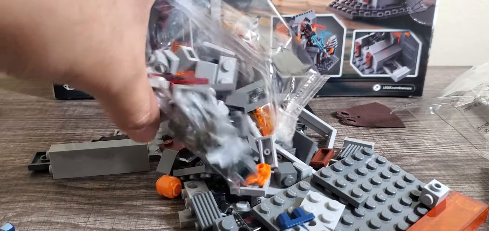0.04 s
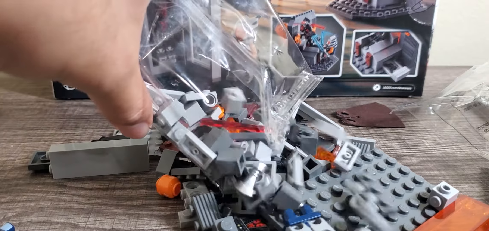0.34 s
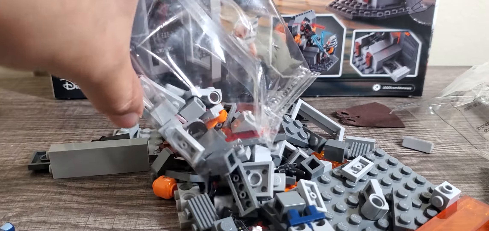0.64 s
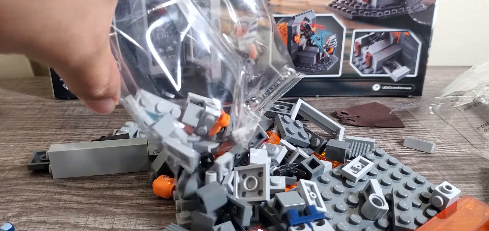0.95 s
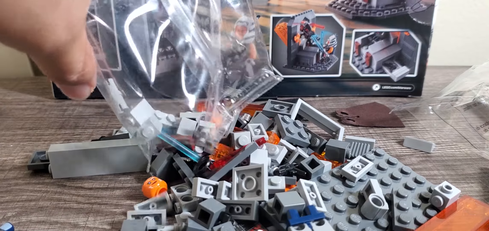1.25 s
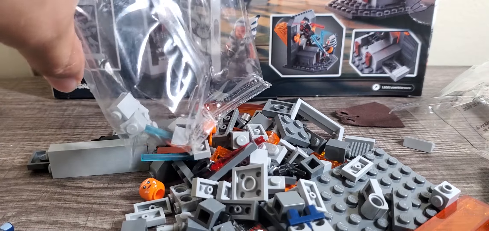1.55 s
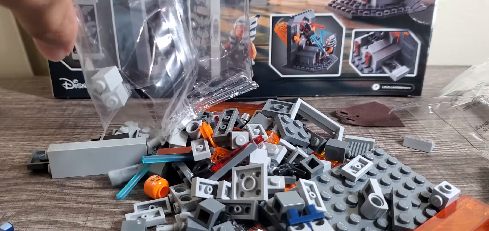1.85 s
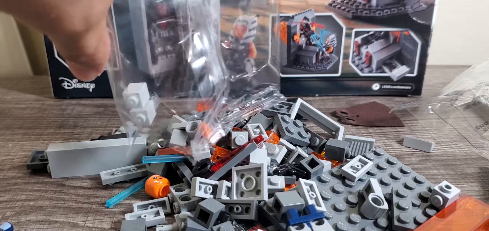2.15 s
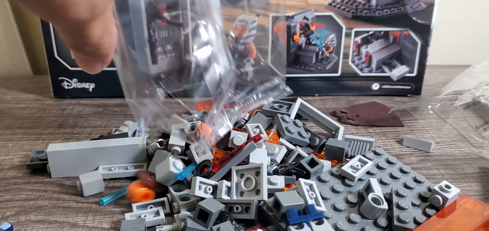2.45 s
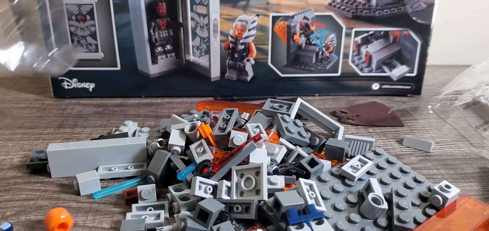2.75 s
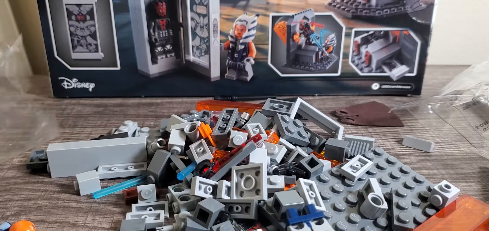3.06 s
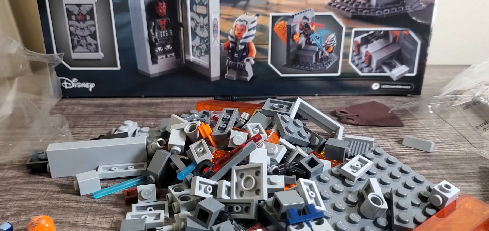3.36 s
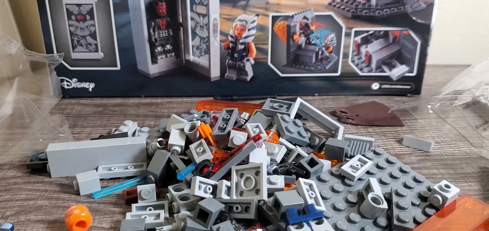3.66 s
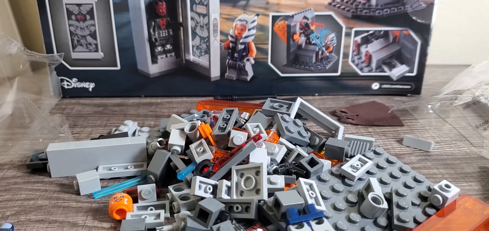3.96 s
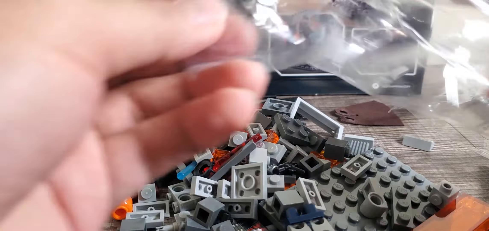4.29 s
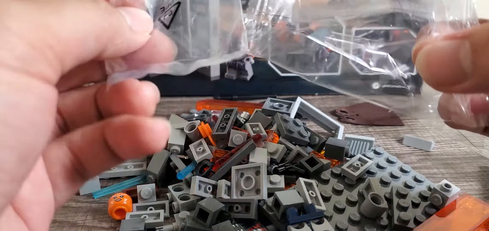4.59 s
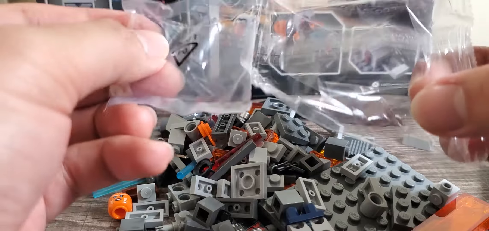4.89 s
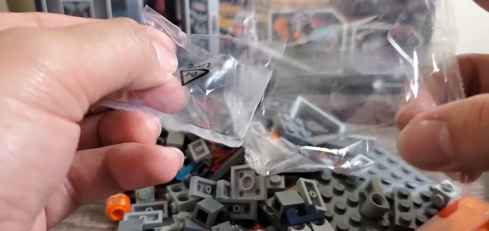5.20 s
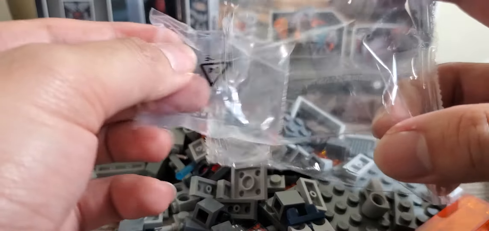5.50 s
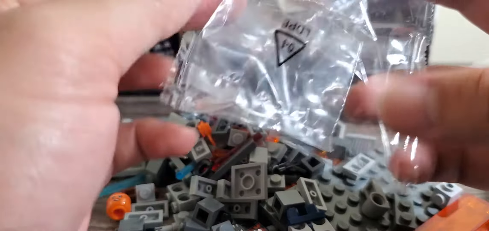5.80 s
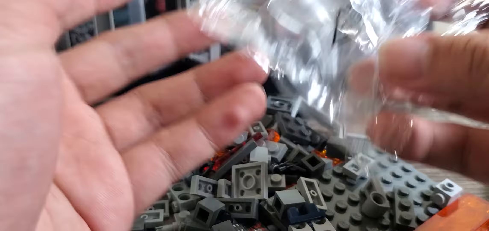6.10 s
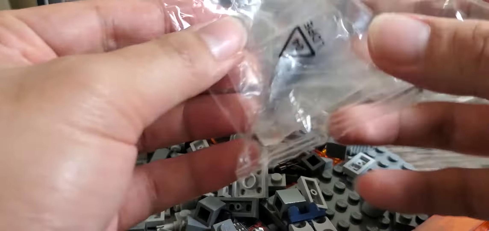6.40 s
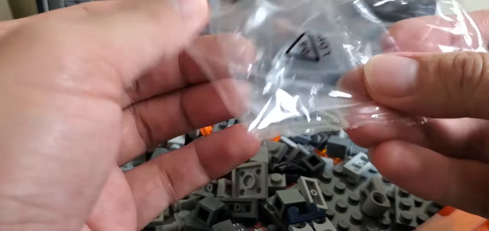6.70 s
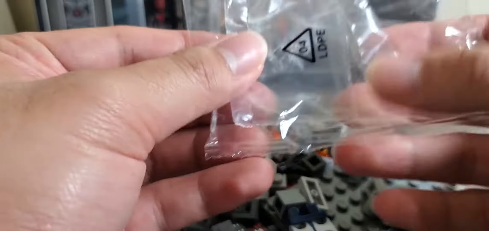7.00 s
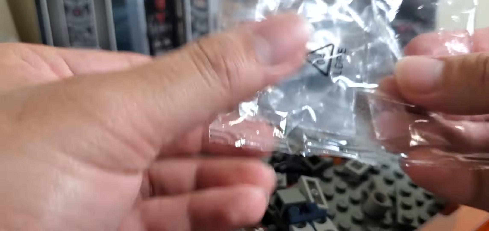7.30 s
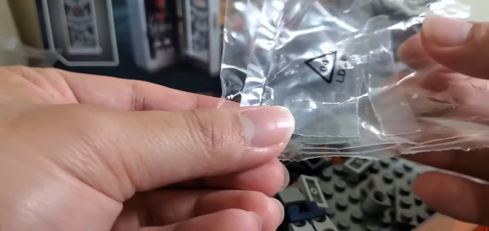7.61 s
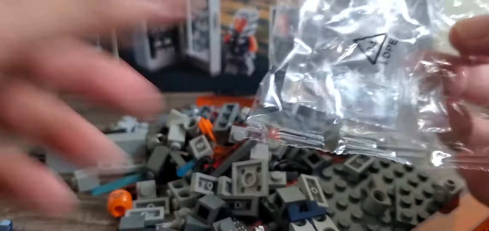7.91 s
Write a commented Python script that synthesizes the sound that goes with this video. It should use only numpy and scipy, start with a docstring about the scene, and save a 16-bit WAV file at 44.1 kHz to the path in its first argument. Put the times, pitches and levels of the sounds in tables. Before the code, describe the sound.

Right from the start, small plastic bricks pour from a bag onto a heap on a wooden table, somewhat to the left. The dense, bright clatter carries hard clacks, tiny high pings and faint knocks from the wood, and thins out by about 1.5 seconds. Two shorter spills follow, at about 1.8 and 2.3 seconds. From 2.6 to 3.9 seconds it is much quieter: a round piece rolls faintly over the wood and the bag gives a few light ticks. At about 4 seconds the thin empty plastic bag starts being pulled and crumpled, close and almost central. Creases snap dryly, the film crackles and rustles, and the sheet pops over with soft hollow flaps. The irregular crinkling grows a little stronger after 5.5 seconds and continues until about 8 seconds. The stereo sound is close, in a small room with a faint low hum throughout.

```python
"""Plastic bricks poured on a table, then the bag crumpled

A small room with a low hum, a stereo pair of microphones. To the left, small bricks slide from a bag
onto a heap on a wooden table, clacking and ringing in one long pour and two last shakes; a round
piece rolls over the wood. Then, close up and almost central, the thin empty bag is pulled and
crumpled: creases snap, the sheet crackles and flaps."""
import sys
import numpy as np
from scipy import signal
from scipy.fft import rfft, irfft, next_fast_len
from scipy.io import wavfile

SR = 44100
rng = np.random.default_rng(int(sys.argv[2]) if len(sys.argv) > 2 else 0)


def materialize(psi):
    """Save the field psi as 16-bit PCM at rate SR to the path in sys.argv[1].

    A 1-D psi becomes a single channel; in a 2-D psi each row is a channel.
    """
    bounded = np.clip(np.atleast_2d(psi).T, -1, 1)
    quanta = np.round(bounded * 32767).astype(np.int16)
    wavfile.write(sys.argv[1], SR, quanta)


N = 355005

# Spectrum of a crease giving way in the plastic film: frequency_hz, level_db
CREASE_SPECTRUM = [(120, -31.5), (200, 6), (273, -37), (473, -11.5), (821, -4), (1120, -8), (1740, -2.5),
                   (2020, -4.5), (3490, 0), (6280, 0), (8270, -7), (13300, -2), (16000, -2)]
# Spectrum of a whole panel of the bag moving: frequency_hz, level_db
PANEL_SPECTRUM = [(70, 6), (130, -6.5), (220, -4.5), (400, -3), (750, -1), (1100, -10.5), (1900, -20.5),
                  (4500, -41)]
CREASE_T60_S = .012


def amp(db):
    """Decibels to gain."""
    return 10 ** (np.asarray(db) / 20)


def unit(x):
    """Scaled to rms 1."""
    return x / np.sqrt(np.mean(x ** 2) + 1e-20)


def along(points, hz):
    """A curve of (frequency_hz, value) points, read on a log frequency axis."""
    point_hz, values = np.transpose(points)
    return np.interp(np.log(hz + 1), np.log(point_hz + 1), values)


def above(hz, corner_hz):
    """Smooth step from 0 below the corner to 1 above it."""
    return hz ** 6 / (hz ** 6 + corner_hz ** 6)


def microphone_pair(hz, count):
    """Random left and right spectra, alike in the bass and less so in the treble."""
    # Likeness of the sound at the two microphones: frequency_hz, coherence
    likeness = [(100, 0.94), (500, 0.88), (1500, 0.59), (5000, 0.53), (15000, 0.084)]
    shared, *own = np.exp(2j * np.pi * rng.random((3, count, len(hz)), dtype=np.float32))
    alike = np.clip(along(likeness, hz), 0, 1)
    return np.sqrt(alike) * shared + np.sqrt(1 - alike) * np.array(own)


def noise(spectrum):
    """Steady stereo noise of rms 1."""
    size = next_fast_len(N, True)
    hz = np.fft.rfftfreq(size, 1 / SR)
    coloured = microphone_pair(hz, 1)[:, 0] * amp(along(spectrum, hz))
    return unit(irfft(coloured, size)[:, :N])


def place(times, sounds):
    """Sum short stereo sounds (2, events, samples) at their times."""
    index = (np.asarray(times) * SR).astype(int)[:, None] + np.arange(sounds.shape[-1])
    return np.array([np.bincount(index.ravel(), side.ravel(), N)[:N] for side in sounds])


def cracks(body_db, spectrum, t60, uneven_db, size=512):
    """Short bursts of energy 1 with their own formants, decay and direction; body_db acts below 6 kHz."""
    count = len(body_db)
    hz, t = np.fft.rfftfreq(size, 1 / SR), np.arange(size) / SR
    knots = rng.standard_normal((count, 24))
    # small parts resonate only in the treble
    formants = signal.resample(knots, len(hz), axis=1) * above(hz, 1900)
    colour = amp(along(spectrum, hz) + uneven_db * formants + body_db[:, None] * (1 - above(hz, 5980)))
    lag, pan, life = rng.standard_normal((3, count, 1))
    sides = np.array([1, -1])[:, None, None]
    left_lead_s = .00006 + .00008 * lag
    direction = np.exp(sides * 1j * np.pi * hz * left_lead_s) * amp(sides * 1.32 * pan)
    fade = amp(-60 * t / (t60 * np.exp(.25 * life))) * (1 - np.exp(-t / .0002))
    burst = irfft(microphone_pair(hz, count) * colour * direction) * fade
    return burst / np.sqrt(np.sum(burst ** 2, axis=(0, 2), keepdims=True) / 2)


def rings(hz, t60, attack_s, size=1536):
    """One damped mode of energy 1 for each pitch; its phase differs between the microphones."""
    t = np.arange(size) / SR
    phase = 2 * np.pi * rng.random((2, len(hz), 1))
    fade = amp(-60 * t / t60) * (1 - np.exp(-t / attack_s))
    return np.sin(2 * np.pi * hz[:, None] * t + phase) * fade / np.sqrt(np.sum(fade ** 2) / 2)


def swarm(start_s, end_s, per_s, spread_db):
    """Irregular times and uneven sizes of many small contacts, of mean power 1."""
    count = int((end_s - start_s) * per_s)
    shift, chance = rng.random((count, 2)).T
    times = start_s + np.abs(np.arange(count) + 2 * shift - 1) / per_s
    return times, unit(amp(spread_db * chance ** 2)) * np.sqrt(SR / per_s)


def room_tone():
    """Faint air noise over a narrow low drone, which is stronger with the hands close by."""
    # Rise and fall of the drone: time_s, level_db
    swell = [(0.0, -52), (2.7, -55), (4.6, -50.5), (5.7, -47.5), (6.2, -48), (8.05, -47.5)]
    # Spectrum of the drone: frequency_hz, level_db
    drone = [(25, -39), (42, -29.5), (53, -3), (64, -6), (77, 8), (90, -7), (105, -5), (140, -16.5),
             (260, -43.5)]
    # Spectrum of the air in the room: frequency_hz, level_db
    air = [(35, -32), (60, -7), (87, -7), (108, -15), (274, -19), (862, -51), (7400, -58.5), (8710, -60.5),
           (16000, -62)]
    drone_db = np.interp(np.arange(N) / SR, *np.transpose(swell))
    return amp(drone_db - 3) * noise(drone) + amp(-57) * noise(air)


def room(x, wet_db):
    """The sound plus a diffuse tail from the near walls, whose treble dies first."""
    # Decay of the room: frequency_hz, t60_s
    decay = [(150, 0.35), (1000, 0.32), (4000, 0.13), (9000, 0.12), (16000, 0.16)]
    wash = noise([(100, -2), (5000, -6), (12000, -6.5)])[:, :SR // 2]
    hz, t, spectra = signal.stft(wash, SR, nperseg=256)
    tail = signal.istft(spectra * amp(-60 * t / along(decay, hz)[:, None]), SR, nperseg=256)[1]
    tail = np.pad(tail / np.linalg.norm(tail[0]), ((0, 0), (220, 0)))  # arrives 5 ms late
    return x + amp(wet_db) * signal.fftconvolve(x, tail, axes=1)[:, :N]


def rolling_piece(fade_s=.032):
    """A round piece ticks softly over the grain of the wood."""
    # Runs across the table: start_s, end_s, level_db
    runs = [(2.617, 2.886, -60), (2.949, 3.126, -64.5), (3.58, 3.86, -64)]
    # Spectrum of one tick on the grain: frequency_hz, level_db
    tick_spectrum = [(200, -9), (600, 1), (950, -7), (1400, -1.5), (2700, -3), (4500, -9.5), (7000, -17.5),
                     (16000, -31)]
    times, sizes = swarm(2.5, 4, per_s=400, spread_db=15)
    start, end, db = np.transpose(runs)[:, :, None]
    moving = np.clip(np.minimum(times - start, end - times) / fade_s + .5, 0, 1)
    level = np.sum(amp(db) * moving, 0)
    ticks = cracks(np.zeros(len(times)), tick_spectrum, t60=.02, uneven_db=4.5)
    return place(times, ticks * (sizes * level)[:, None])


def handling(at, grip_db_per_s=675, relax_db_per_s=286):
    """Gains of crackle and flutter: the fingers tighten quickly and hold, the film relaxes more slowly."""
    # Squeezes and pulls of the bag: start_s, length_s, crackle_db, flutter_db
    squeezes = [(2.951, 0.011, -52.5, -52.5), (3.042, .02, -51.5, -56), (3.196, 0.011, -51.5, -56),
                (3.504, 0.016, -60.5, -54.5), (3.61, .1, -51, -62), (3.806, 0.0081, -52, -65),
                (3.922, 0.35, -47.5, -59), (4.305, 0.077, -35.5, -43.5), (4.454, 0.064, -48.5, -58),
                (4.614, 0.049, -44.5, -47.5), (4.863, 0.025, -39.5, -52), (4.966, 0.03, -29.5, -42),
                (5.175, 0.02, -32.5, -41), (5.284, 0.047, -44, -48), (5.361, 0.084, -51.5, -49.5),
                (5.564, 0.021, -33, -47), (5.617, 0.098, -33, -48), (5.862, 0.047, -35, -49.5),
                (6.009, 0.048, -32.5, -43), (6.315, .07, -29.5, -40.5), (6.462, 0.078, -24.5, -43),
                (6.595, .04, -38, -45), (6.711, 0.047, -37, -50.5), (6.928, 0.088, -35.5, -51.5),
                (7.156, 0.056, -32, -45), (7.252, 0.023, -38, -47), (7.403, 0.063, -35.5, -48.5),
                (7.476, 0.031, -25.5, -60), (7.631, 0.026, -25, -49), (7.703, 0.18, -41.5, -51),
                (7.842, 0.0076, -28, -53), (7.928, 0.012, -40, -48)]
    held = (3.93, 5.97, -58, -62)  # the bag stirs for as long as it is in the hands
    t = np.arange(0, N, 64) / SR
    start, length, *levels = np.transpose(squeezes + [held])[:, :, None]
    grip_db = -grip_db_per_s * np.maximum(start - t, 0)
    relax_db = -relax_db_per_s * np.maximum(t - start - length, 0)
    return [np.interp(at, t, amp(np.max(db + grip_db + relax_db, 0))) for db in levels]


def bag_crackle():
    """Swarms of tiny creases give way while film rubs on film and the sheet flutters."""
    # Spectrum of film sliding on film: frequency_hz, level_db
    rub_spectrum = [(400, -29), (1200, -20), (2700, 7), (4500, -2), (8000, 1), (16000, -22.5)]
    times, sizes = swarm(2.75, 8.05, per_s=750, spread_db=28)
    level = handling(times)[0] * amp(1.5)
    creases = cracks(np.zeros(len(times)), CREASE_SPECTRUM, CREASE_T60_S, uneven_db=3.5, size=256)
    grip, shake = handling(np.arange(N) / SR)
    # capped: a firmer grip buckles the film instead of sliding it
    rub = noise(rub_spectrum) * np.minimum(grip * amp(-20), amp(-36))
    flutter = noise(PANEL_SPECTRUM) * shake * amp(-1.5)
    return place(times, creases * (sizes * level)[:, None]) + rub + flutter


def bag_snaps():
    """A large crease buckles with a dry, sharp tick, and the sheet shivers briefly after it."""
    # Creases snapping through: start_s, treble_db, body_over_treble_db
    buckles = [(2.855, -47.5, -8), (2.9513, -53.5, 7.5), (3.0343, -33.5, 0), (3.1916, -53.5, 10),
               (3.4985, -52, 7), (3.9434, -27, -2.5), (3.9574, -33, 0.5), (3.9978, -25, -6),
               (4.0111, -33, -3), (4.0374, -21.5, -7.5), (4.087, -38.5, -1), (4.1215, -21.5, -11.5),
               (4.1544, -21, -10), (4.183, -29, -7.5), (4.2045, -31.5, 1), (4.237, -23, -10),
               (4.2808, -27, -7.5), (4.3123, -31, 2.5), (4.3653, -22.5, -3), (4.494, -42, 5.5),
               (4.562, -42, 2.5), (4.613, -28, -6), (4.651, -30.5, -6), (4.734, -29.5, -10.5),
               (4.7642, -34.5, -3), (4.7956, -32, 0.5), (4.8198, -29, -2.5), (4.868, -28.5, -0.5),
               (4.923, -37, 1.5), (4.9726, -26, -13), (4.9909, -23, -7), (5.0943, -38, -1),
               (5.149, -37.5, 4), (5.1608, -29.5, -7), (5.2131, -27, -5.5), (5.2724, -28.5, -2),
               (5.2788, -23, -4.5), (5.2995, -21.5, -4), (5.3188, -29.5, -10), (5.637, -26, -7),
               (5.6953, -31, -0.5), (5.7108, -17.5, -3), (5.909, -21.5, -39), (5.958, -34.5, -4.5),
               (6.012, -23, -15), (6.039, -21.5, -14), (6.12, -28.5, -1), (6.168, -25.5, -2),
               (6.2192, -27, 0), (6.3303, -22, -3), (6.377, -30, 1.5), (6.4581, -27, -8),
               (6.4976, -23, -15), (6.5293, -20.5, -20), (6.6028, -26.5, -16), (6.6733, -21, -14),
               (6.7081, -40, 7), (6.764, -26.5, -14), (6.862, -26, -3), (6.9256, -31.5, 0),
               (6.941, -16, -17.5), (6.9648, -23, -21), (6.989, -19.5, -15), (7.0186, -21.5, -34),
               (7.1232, -32.5, -14), (7.205, -21, -5), (7.2556, -17.5, -8), (7.2846, -27, -3),
               (7.3653, -35, -5.5), (7.406, -25, -10), (7.4342, -32, -12), (7.4782, -24.5, -3.5),
               (7.6127, -33, -4), (7.6426, -24.5, 1), (7.698, -21.5, -16), (7.7435, -22.5, -11),
               (7.7906, -29, -8), (7.8154, -22.5, -5.5), (7.8657, -20, -6.5), (7.9268, -25, -3.5)]
    times, db, body_db = np.transpose(buckles)
    sizes = (amp(db) * np.hypot(1, amp(body_db)))[:, None]
    tick = cracks(body_db + 2.5, CREASE_SPECTRUM, CREASE_T60_S, uneven_db=4) * sizes * amp(23)
    shiver = cracks(body_db + 10, CREASE_SPECTRUM, t60=.05, uneven_db=2, size=2048) * sizes * amp(12)
    return place(times, tick) + place(times, shiver)


def bag_flaps():
    """A whole panel pops over: a soft thud and a brief hollow note."""
    # Panels popping over: start_s, level_db, pitch_hz
    pops = [(3.032, -32.5, 494), (3.189, -39.5, 760), (3.496, -40.5, 473), (4.303, -29.5, 817),
            (4.362, -35, 328), (4.619, -30.5, 276), (4.874, -29.5, 700), (4.943, -28, 620),
            (4.974, -23, 723), (5.276, -32, 534), (5.565, -23.5, 425), (5.591, -32, 724), (5.707, -20, 500),
            (6.326, -29, 665), (6.453, -32.5, 850), (6.497, -28, 800), (7.198, -32, 830), (7.64, -30, 805)]
    times, db, hz = np.transpose(pops)
    thuds = cracks(np.zeros(len(times)), PANEL_SPECTRUM, t60=.04, uneven_db=0, size=3072)
    notes = rings(hz, t60=.027, attack_s=.002, size=3072)
    return place(times, (thuds + notes) * amp(db + 18)[:, None])


def table_knocks(times, forces):
    """Every blow passes through the heap and knocks faintly on the wood."""
    # Modes of the wooden top: pitch_hz, level_db, t60_s
    wood_modes = [(125, -5, 0.089), (196, -1, 0.24), (298, -13, 0.14)]
    t = np.arange(SR // 5) / SR
    knock = sum(amp(db - 60 * t / t60) * np.sin(2 * np.pi * hz * t) for hz, db, t60 in wood_modes)
    blows = np.bincount((times * SR).astype(int), forces * rng.standard_normal(len(times)), N)
    return amp(-27) * signal.fftconvolve(blows, knock / np.linalg.norm(knock))[:N]


def heap_resonance(x, hz, width_hz, level_db):
    """The many alike bricks lying in the heap ring along at a shared pitch."""
    b, a = signal.iirpeak(hz, hz / width_hz, SR)
    return x + amp(level_db) * signal.lfilter(b, a, x)


def brick_strikes(times, sizes, body_db, t60, ring_db, ring_t60):
    """Brick on brick: a dry crack, one of the modes the alike pieces share, and the table beneath."""
    # Resonances of the bricks: pitch_hz, width_hz, level_db
    brick_modes = [(2690, 240, 3.5), (3326, 47, -14.5), (3940, 72, -23.5), (5860, 130, -5), (6450, 37, 0.5),
                   (7130, 130, -12.5), (8770, 120, -1), (11860, 300, 0.5), (13400, 310, -15),
                   (15200, 110, 5.5)]
    # Spectrum of the crack: frequency_hz, level_db
    crack_spectrum = [(59, -66.5), (100, 0), (160, -32), (202, -15.5), (239, -17), (513, -6.5), (1130, -8),
                      (3540, -1), (4870, -4), (6700, -1.5), (7940, -10.5), (12700, -6.5), (13800, 1),
                      (16000, -20)]
    mode_hz, width_hz, mode_db = np.transpose(brick_modes)
    pick = rng.integers(len(mode_hz), size=len(times))
    pitch_hz = mode_hz[pick] + width_hz[pick] / 2 * rng.standard_normal(len(times))
    ring = rings(pitch_hz, ring_t60, attack_s=.000097) * (sizes * amp(ring_db + mode_db[pick]))[:, None]
    crack = cracks(body_db, crack_spectrum, t60, uneven_db=4.5) * sizes[:, None]
    return place(times, crack) + place(times, ring) + table_knocks(times, sizes * amp(body_db / 2))


def bouncing_pieces(bounces=4):
    """A small free piece rings on one high note, then chatters on in quick bounces."""
    # Small pieces bouncing free: start_s, level_db, pitch_hz
    pings = [(0.0199, -22.5, 14700), (0.264, -18, 11100), (0.5387, -14, 13800), (0.5447, -18.5, 14000),
             (0.5935, -14, 13900), (0.586, -29, 5640), (0.743, -27, 5620), (0.7567, -19, 13600),
             (0.7953, -26, 10770), (0.834, -24.5, 11030), (0.8787, -22, 5610), (0.8937, -28, 5660),
             (0.933, -23, 5640), (1.0803, -17, 14300), (1.1217, -25, 14300), (1.2265, -22, 13900),
             (1.2535, -21, 14300), (1.2962, -32, 14300), (1.7821, -28, 14100), (1.9039, -29, 12200),
             (2.0072, -38.5, 13900), (2.0275, -34.5, 9540), (2.3026, -16, 15600), (2.3306, -13.5, 15300),
             (2.3659, -20, 15400), (2.4637, -20, 15860), (2.5617, -7, 15650)]
    times, db, hz = np.transpose(pings)
    first = place(times, rings(hz, t60=.02, attack_s=.002) * amp(db + 21)[:, None])
    gap, softness, detune = rng.random((3, len(times), bounces))
    bounce_s = times[:, None] + np.cumsum(.0016 + .043 * gap, axis=1)
    bounce_db = np.minimum(db, -21)[:, None] + 12.5 - 7 * softness - 3.2 * np.arange(bounces)
    bounce_hz = hz[:, None] * (1 + .049 * (detune - .5))  # each new contact detunes the piece a little
    chatter = rings(bounce_hz.ravel(), t60=.014, attack_s=.00041) * amp(bounce_db).reshape(-1, 1)
    return first + place(bounce_s.ravel(), chatter)


def brick_clacks():
    """The harder landings stand out of the stream."""
    # Single bricks landing: start_s, treble_db, body_over_treble_db
    landings = [(0.018, -27.5, 2.5), (0.073, -19, -12), (0.0936, -19, -7), (0.1238, -22.5, -17),
                (0.258, -21.5, 2), (0.361, -21, -12), (0.408, -22, -10), (0.4893, -22, -6), (0.742, -30, 4),
                (0.7675, -29, 0.5), (0.7955, -25.5, 2), (0.932, -24.5, 4.5), (0.9687, -23.5, 0.5),
                (1.0334, -25, 2.5), (1.1748, -33, 5), (1.2966, -30, -5), (1.3335, -29, 2),
                (1.3968, -35, 3.5), (1.4473, -37, 3), (1.4832, -39.5, 8.5), (1.4924, -39, 8),
                (1.5463, -43, 6), (1.767, -29.5, -3), (1.7833, -15, -15), (1.8175, -19, -1.5),
                (1.8354, -28, 3), (1.8817, -26, 4), (1.9172, -26, -3), (2.007, -29, -6),
                (2.0577, -39, -3.5), (2.3035, -21.5, -11), (2.321, -21.5, -6), (2.3291, -20, -8),
                (2.3666, -30, 0), (2.411, -31, 6), (2.4474, -30.5, 6.5), (2.462, -32, -9),
                (2.536, -37, 6.5), (2.5625, -28.5, -7), (2.5928, -31.5, -1)]
    times, db, body_db = np.transpose(landings)
    sizes = amp(db + 21.5) * np.hypot(1, amp(body_db))
    return brick_strikes(times, sizes, body_db - 3, t60=.02, ring_db=-15, ring_t60=.03)


def brick_flow(at, trickle_db=-13.5, settle_db_per_s=230, dulling_db_per_s=8):
    """Gain and body_db of the stream: each surge builds from a trickle, thins out and settles."""
    # Surges out of the bag: start_s, full_flow_s, end_s, level_db, thinning_db_per_s, body_over_treble_db
    surges = [(0.04, 0.09, 0.23, -38, 6.5, 3), (0.0, 0.179, 0.4, -22.5, 10.5, -2.5),
              (0.39, 0.404, 0.68, -28, 37, 1.5), (0.646, 0.91, 1.253, -29.5, 22.5, -0.5),
              (1.314, 1.345, 1.424, -40, 48, 3.5), (1.594, 1.607, 1.712, -54, 38, 3.5),
              (1.76, 1.776, 2.062, -33.5, 40.5, 0.5), (2.2, 2.199, 2.215, -61, 48, 4.5),
              (2.291, 2.32, 2.41, -30, 75, 0.5), (2.44, 2.456, 2.6, -33.5, 75, 4.5)]
    start, full, end, db, thinning, body_db = np.transpose(surges)[:, :, None]
    build_db = trickle_db * np.clip((full - at) / np.maximum(full - start, 1 / SR), 0, 1)
    fall_db = thinning * np.maximum(at - full, 0) + settle_db_per_s * np.maximum(at - end, 0)
    power = (at >= start) * amp(db + build_db - fall_db) ** 2 + 1e-20
    # falling bricks sound bright, sliding ones duller
    colour_db = body_db + dulling_db_per_s * np.clip(at - start, 0, 1)
    return np.sqrt(power.sum(0)), np.average(colour_db, axis=0, weights=power)


def brick_pour():
    """Hundreds of small collisions a second as the bricks slide over one another."""
    times, sizes = swarm(0, 2.75, per_s=900, spread_db=14)
    level, body_db = brick_flow(times)
    return brick_strikes(times, sizes * level, body_db, t60=.029, ring_db=-7.5, ring_t60=.04)


def scene():
    """Bricks on the table to the left, the bag nearer the microphones and almost central."""
    clatter = heap_resonance(brick_pour() + brick_clacks(), hz=3540, width_hz=96, level_db=-5)
    bricks = clatter * amp([[1.3], [-2]]) + bouncing_pieces() * amp([[3.2], [-8]]) + rolling_piece()
    bag = (bag_crackle() + bag_snaps() + bag_flaps()) * amp([[1.2], [-1.5]])
    return room(bricks, wet_db=-12) + room(bag, wet_db=-15) + room_tone()


def record(dry):
    """The microphones lose the deepest bass, and nothing is kept above the band limit."""
    low_cut_hz, top_hz = 29, 16100
    size = next_fast_len(N + SR // 2)
    hz = np.fft.rfftfreq(size, 1 / SR)
    passband = np.clip((top_hz - hz) / 400 + .5, 0, 1) * above(hz, low_cut_hz)
    return irfft(rfft(dry, size) * passband, size)[:, :N]


dry = scene()
out = record(dry)
materialize(out)
```